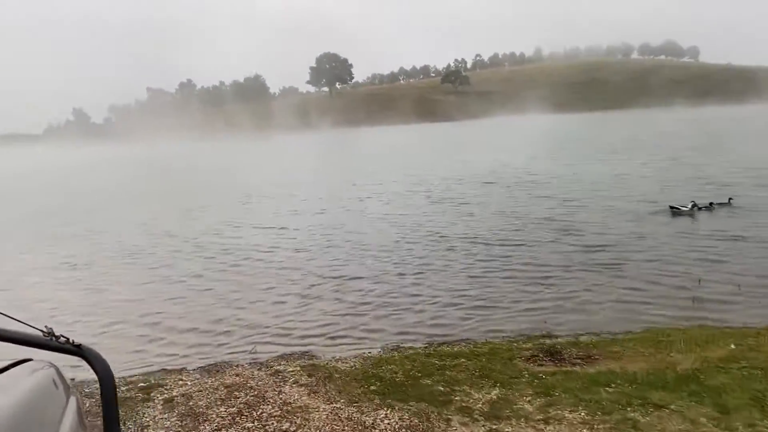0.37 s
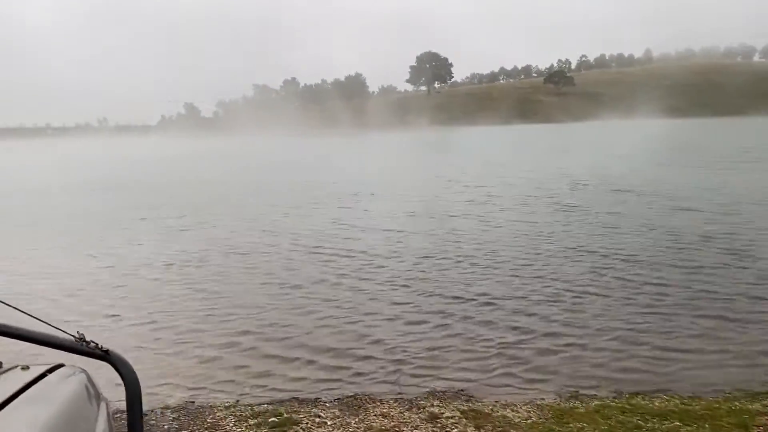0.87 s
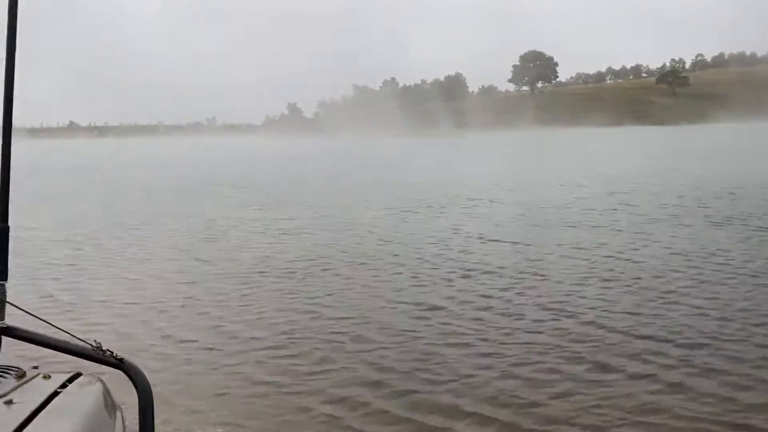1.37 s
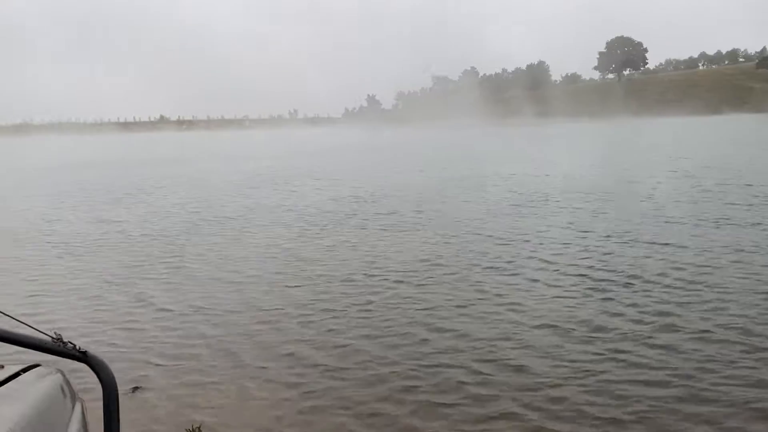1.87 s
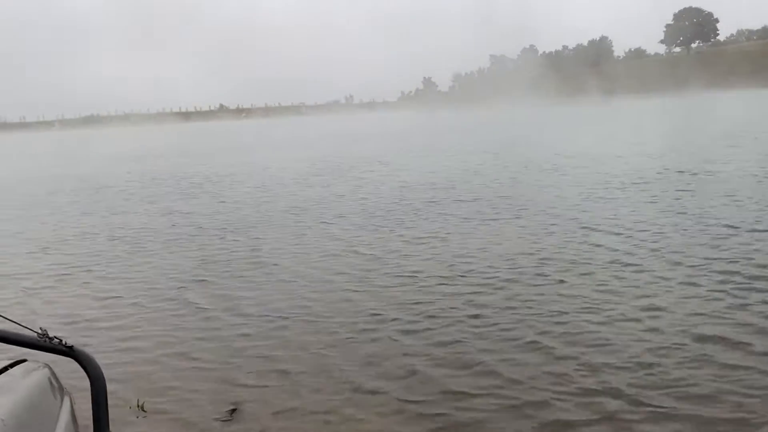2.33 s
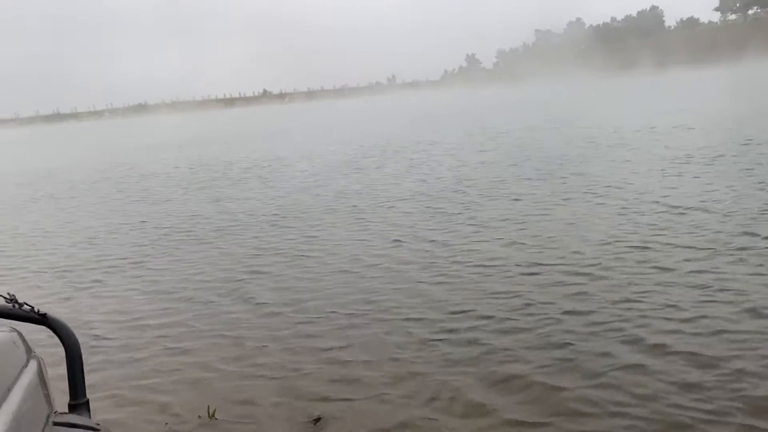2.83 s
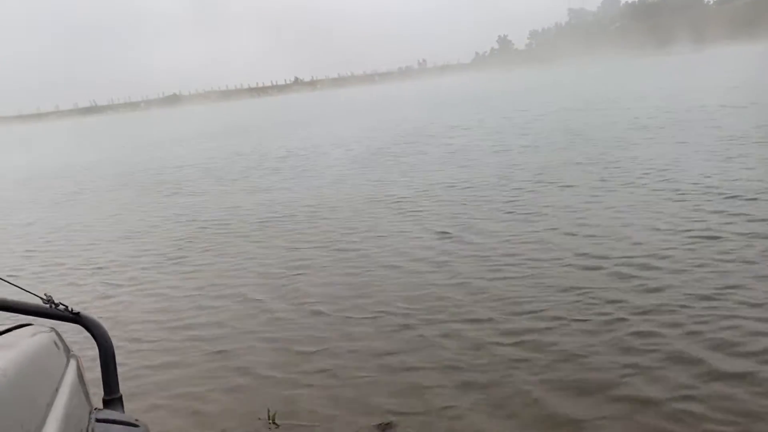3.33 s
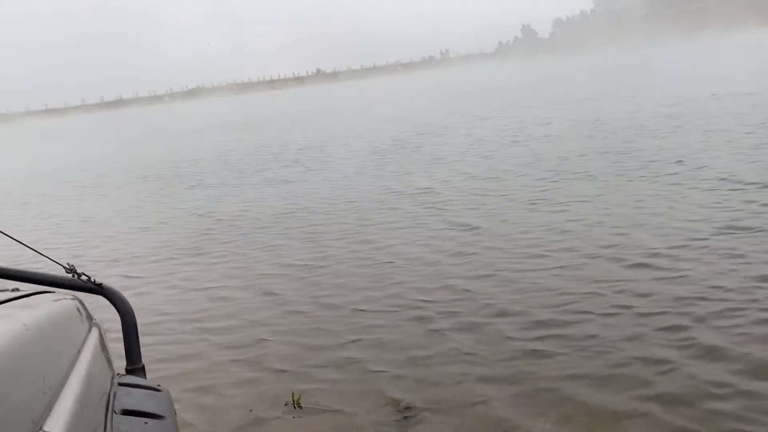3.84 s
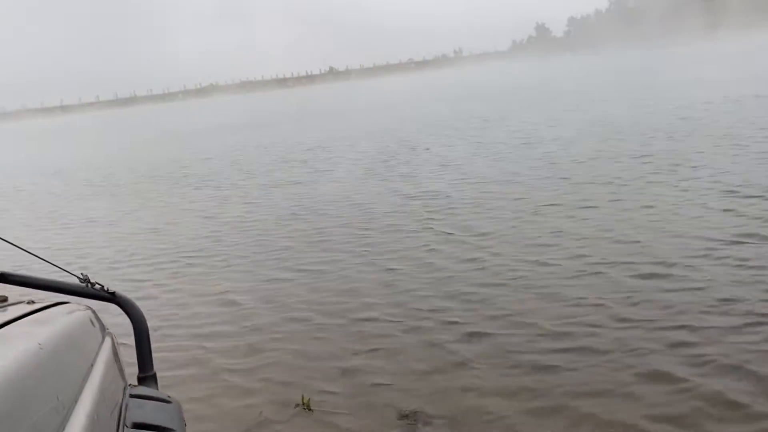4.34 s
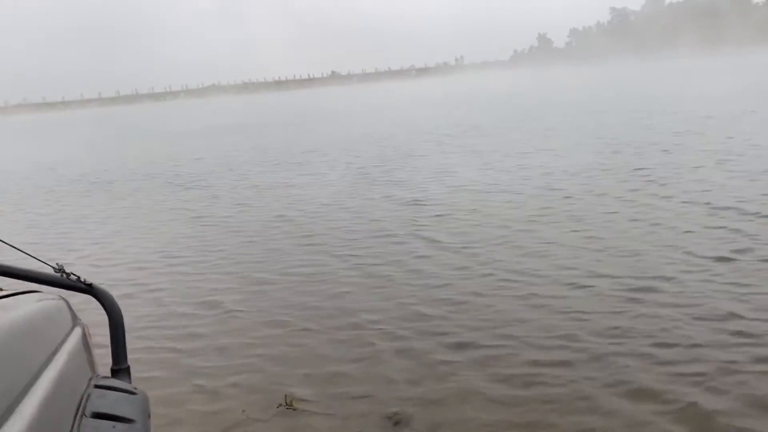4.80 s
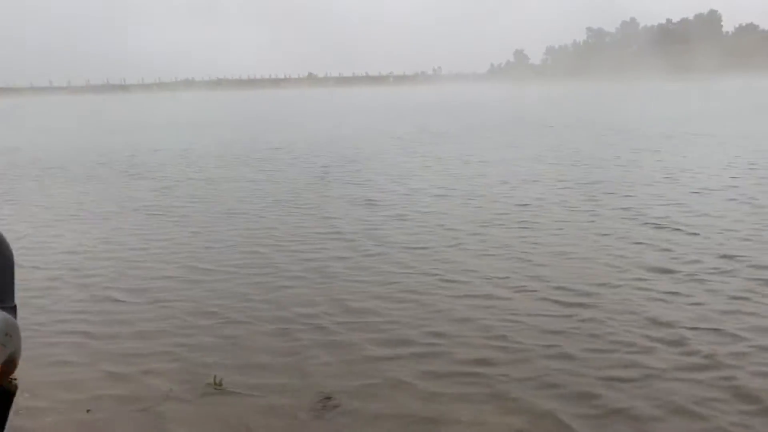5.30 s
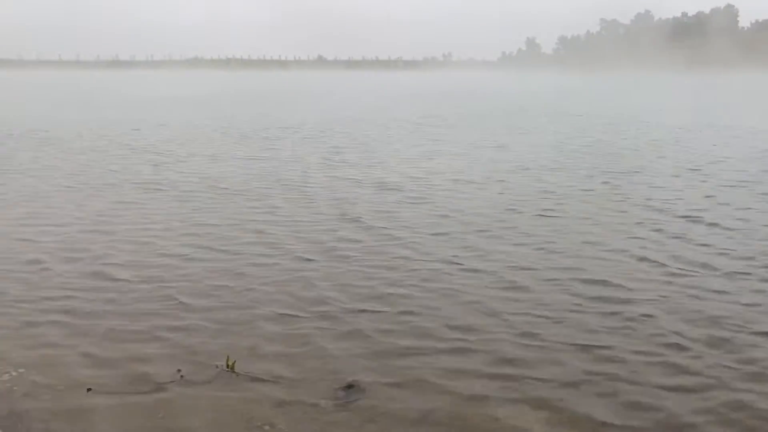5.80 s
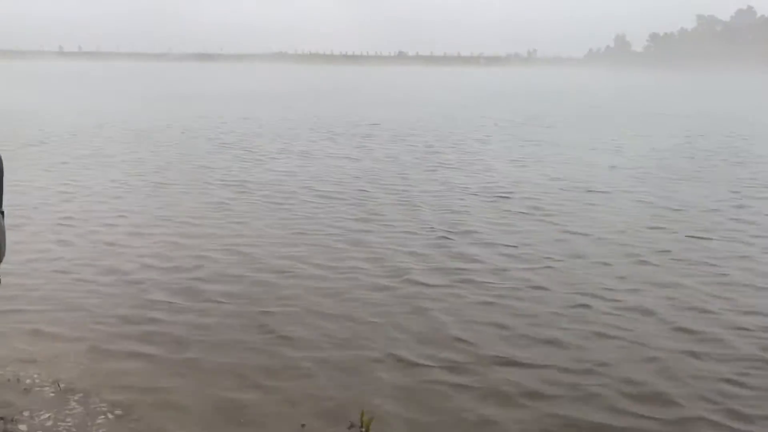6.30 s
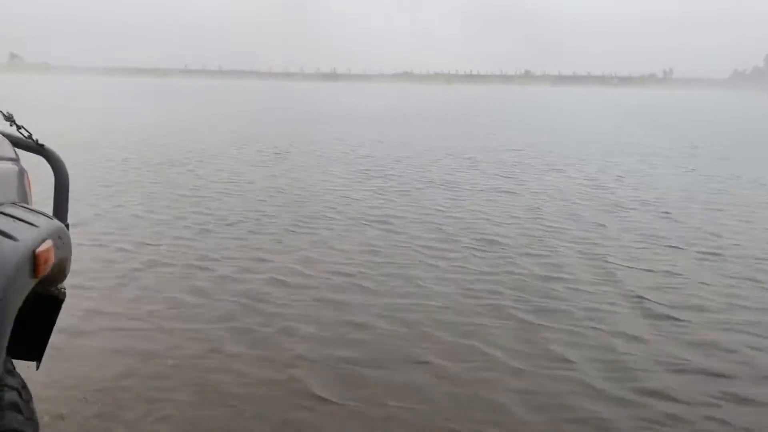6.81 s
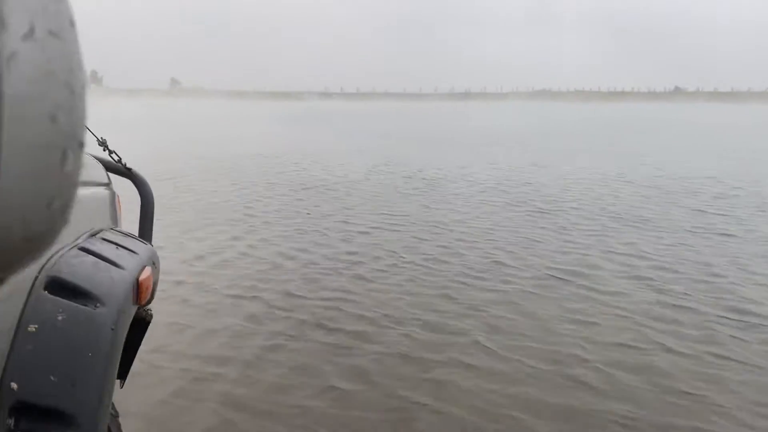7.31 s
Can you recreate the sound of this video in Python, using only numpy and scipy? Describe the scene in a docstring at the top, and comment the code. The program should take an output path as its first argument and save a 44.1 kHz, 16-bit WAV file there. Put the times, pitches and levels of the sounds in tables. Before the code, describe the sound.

An off-road vehicle's engine throbs low as dull bumps give way to gulping, splashing water, then it surges over louder churning.

```python
"""An off-road vehicle with a five-cylinder engine rolls down a shore and wades, heard from a side window.
First come dull bumps, falling thuds with a rattle, over the throb and boom of exhaust tones and a gear whine.
Then gulps ring like closing air pockets, spray bursts and rings a panel, and short tones squeak.
The engine speeds up near 3 s, slows towards 5 s and surges at 6 s, over a rumble of shaped noise.
Churning noise and bubbles run throughout, swelling in surges and growing strongest with the late engine surge."""
import sys
import numpy as np
from scipy import signal
from scipy.fft import rfft, irfft, next_fast_len
from scipy.io import wavfile
from scipy.ndimage import uniform_filter1d

SR = 44100
rng = np.random.default_rng(int(sys.argv[2]) if len(sys.argv) > 2 else 0)


def undo_db(level):
    """Turn decibels back into plain size, where 20 dB means ten times bigger."""
    steps = np.asarray(level, float) / 20
    return 10 ** steps


def output_pcm(signal):
    """Save a mono or channel-first signal as 16-bit PCM at the path in sys.argv[1].

    Samples are clipped to [-1, 1] before scaling.
    """
    pcm = np.clip(np.atleast_2d(signal).T, -1, 1) * 32767
    wavfile.write(sys.argv[1], SR, np.round(pcm).astype(np.int16))


N = 337806
TIME = np.arange(N) / SR  # s
HIT_TIME = np.arange(SR // 4) / SR  # s, time within one short event


def evened(x):
    """Scales to rms 1."""
    return x / np.sqrt(np.mean(x ** 2) + 1e-20)


def read(points, hz, axis=1):
    """Reads one column of a spectrum on a log-frequency axis."""
    columns = np.transpose(points)
    return np.interp(np.log(hz + 1), np.log(columns[0] + 1), columns[axis])


def curve(rows):
    """Joins the (t, value) rows of a table into one value a sample."""
    s, values = np.transpose(rows)
    return np.interp(TIME, s, values)


def wander(top_hz):
    """Slow random drift of rms 1, a sum of twelve slow sines."""
    t = np.arange(0, N + 64, 64) / SR
    slow = sum(np.sin(2 * np.pi * (f * t + rng.random())) for f in np.geomspace(top_hz / 15, top_hz, 12))
    return np.interp(TIME, t, evened(slow))


def band(x, hz, width):
    """A resonance applied twice, scaled to rms 1."""
    b, a = signal.iirpeak(hz, hz / width, SR)
    return evened(signal.lfilter(b, a, signal.lfilter(b, a, x)))


def panned(x, pan_db):
    """Places one sound between left and right by level."""
    return np.array([x * undo_db(pan_db / 2), x * undo_db(-pan_db / 2)])


def add(mix, s, sound):
    """Mixes a sound in at a time."""
    part = mix[:, round(s * SR):][:, :sound.shape[1]]
    part += sound[:, :part.shape[1]]


def fade(t60, rise):
    """Envelope of a short event: a quick rise (s), then a fall of 60 dB in t60 (s), 0.01 s or more."""
    return undo_db(-60 * HIT_TIME / np.maximum(t60, 0.01)) * (1 - np.exp(-HIT_TIME / rise))


def cut(x, s):
    """Takes the stretch of a stereo noise that starts at a time."""
    return np.roll(x, -round(s * SR), 1)[:, :len(HIT_TIME)]


# Stereo width of the noises: (f/Hz, side level over mid/dB, share of side in step with mid [0-1, signed],
# share a quarter cycle ahead [0-1, signed])
STEREO_WIDTH = [(40, 5.5, .1, -1), (200, -7.5, .01, -0.16), (400, -7, 0.13, 1), (1000, -6, 0.024, 0.99),
                (2000, 2.5, 0.046, 0.1), (3400, -3, -0.27, -.3), (5000, -1, -0.62, -.1),
                (6500, -5.5, -.2, .2), (8000, 7, 0.41, .6), (15000, 6.5, .1, .1)]


def noise(spectrum, size, patchy_db, flicker_db):
    """Stereo noise of one colour, with drifting patches and a flicker shared by all bins; mid has rms 1."""
    hop, hz = size // 4, np.fft.rfftfreq(size, 1 / SR)
    z = rng.standard_normal((N // hop + 5, len(hz), 5)).T
    patches = uniform_filter1d(z[4], size=len(hz) // 40 + 1, axis=0)
    patches = evened(uniform_filter1d(patches, size=12, axis=1))
    flicker = evened(uniform_filter1d(rng.standard_normal(z.shape[2]), size=5))
    field = undo_db(read(spectrum, hz)[:, None] + patchy_db * patches + flicker_db * flicker)
    mid, free = (z[:2] + 1j * z[2:4]) * field
    link = (read(STEREO_WIDTH, hz, axis=2) + 1j * read(STEREO_WIDTH, hz, axis=3))[:, None]
    unlinked = np.sqrt(np.clip(1 - abs(link) ** 2, 0, 1))
    side = undo_db(read(STEREO_WIDTH, hz))[:, None] * (link * mid + unlinked * free)
    mid, side = signal.istft(np.array([mid, side]), nperseg=size, noverlap=size - hop)[1][:, :N]
    return np.array([mid + side, mid - side]) / np.std(mid)


def steady(x):
    """Evens out the level over a third of a second."""
    return x / np.sqrt(uniform_filter1d(x ** 2, size=SR // 3) + 1e-9)


# Exhaust level, before its waver: (t/s, level/dB)
EXHAUST_LEVEL = [(0, -22), (0.38, -24), (0.47, -17.5), (1.05, -16), (1.66, -14), (1.73, -23.5), (1.9, -18),
                 (2.9, -17), (3.7, -19), (5.01, -20.5), (5.76, -9.5), (6.76, -12), (7.66, -12)]
# Engine speed: (t/s, f/Hz of the engine cycle)
ENGINE_SPEED = [(0, 8.46), (0.65, 8.35), (1.1, 8.62), (1.3, 8.34), (1.6, 8.3), (1.9, 8.42), (2.38, 8.38),
                (2.7, 9.54), (2.98, 10.27), (3.55, 9.6), (4.4, 9.63), (4.95, 8.22), (5.42, 8.44),
                (6.0, 13.27), (6.09, 13.52), (6.8, 10.86), (7.0, 11.22), (7.22, 11.08), (7.5, 12.22),
                (7.66, 12.58)]
# Five firings a cycle through pipes of uneven length: (multiple of the engine cycle, level/dB)
FIRING_ORDERS = [(5, 1), (6, -6), (7, 2.5), (8, -7.5), (9, 0), (10, -5), (11, -4), (12, 1), (13, -3),
                 (14, 0.5), (15, 5.5), (16, -7), (17, -4.5), (18, -8), (19, 0.5), (20, 2), (21, 1),
                 (22, -5), (23, -3.5), (24, -4.5), (25, 0), (28, -11), (29, -4.5)]
# Colour of the exhaust pipe: (f/Hz, level/dB)
PIPE_COLOUR = [(30, -53.5), (45, -9), (60, -0.5), (85, -5), (105, -3), (125, -21.5), (160, -27),
               (230, -32.5), (275, -21), (320, -50), (450, -20)]
# Silencer boom over the exhaust level; it also swells when a strong multiple meets the silencer: (t/s, level/dB)
BOOM_LEVEL = [(0, -10), (2.4, -7.5), (2.9, -5.5), (4.4, -5), (5.5, -10.5), (6.1, -7), (6.9, -11.5),
              (7.66, -4.5)]
# Gear whine, clearest near idle, before its waver: (t/s, level/dB)
WHINE_LEVEL = [(0, -49), (.4, -36), (1.5, -34.5), (1.75, -42), (2.35, -35), (2.7, -50), (3.2, -42.5),
               (4.5, -51.5), (5.0, -40), (5.4, -42), (5.7, -51), (7.66, -79.5)]
BOOM_HZ, BOOM_WIDTH_HZ = 190.66, 28.3
WHINE_RATIO = 46.4  # whine cycles per engine cycle


def engine():
    """Multiples of the engine cycle pass the pipe and the silencer boom; uneven burning makes each waver."""
    rate, level_db = curve(ENGINE_SPEED), curve(EXHAUST_LEVEL)
    cycles, pipe, boom = np.cumsum(rate) / SR, np.zeros(N), np.zeros(N)
    for k, db in FIRING_ORDERS:
        burn_db = db + 1.9 * wander(top_hz=7)
        phase = 2 * np.pi * (k * cycles + rng.random()) + 0.25 * wander(top_hz=7)
        tone = undo_db(burn_db) * np.cos(phase)
        pipe += undo_db(read(PIPE_COLOUR, k * rate)) * tone
        boom += np.exp(-(2 * (k * rate - BOOM_HZ) / BOOM_WIDTH_HZ) ** 2) * tone
    tones = undo_db(level_db + 1.45 * wander(top_hz=5.4)) * steady(pipe)
    tones += undo_db(level_db + curve(BOOM_LEVEL)) * boom
    whine = np.cos(2 * np.pi * WHINE_RATIO * cycles + 0.4 * wander(top_hz=12))
    tones += undo_db(curve(WHINE_LEVEL) + 2.6 * wander(top_hz=9)) * whine
    # a quarter-cycle copy makes the tones reach the left a little later
    lag = undo_db(-12.5) * signal.hilbert(tones, next_fast_len(N))[:N].imag
    return np.array([tones + lag, tones - lag])


# Colour of the body and tyre rumble: (f/Hz, level/dB per Hz)
RUMBLE_COLOUR = [(15, -43), (25, -3), (46, -9), (70, 0), (97, -16), (141, -3.5), (189, 2), (213, -6),
                 (243, -4.5), (430, -9.5), (600, -48), (780, -78), (1320, -120)]


def rumble():
    """Body and tyres rumble as low noise that follows the exhaust level, 17 dB under it."""
    return undo_db(curve(EXHAUST_LEVEL) - 17) * noise(RUMBLE_COLOUR, size=2048, patchy_db=1.5, flicker_db=-1.8)


# Pockets of air closing in the water: (t/s, level/dB, f/Hz at the start,
# cycles until 60 dB is lost [taken as 2-40], slap over the gulp level/dB)
AIR_POCKETS = [(0.341, -23, 1430, 5, -6), (0.694, -19.5, 477, 10.5, -19), (0.748, -46, 2350, 18, -20),
               (0.759, -20, 855, 7, -22), (0.783, -12, 820, 10, -29), (0.828, -25, 800, 16, -19),
               (0.862, -21.5, 597, 9, -25), (0.934, -21, 960, 8, -23), (0.974, -19, 1210, 10, -20),
               (1.275, -19, 670, 6, -18), (1.338, -18, 736, 4, -13), (1.369, -24, 900, 5, -30),
               (1.382, -18, 810, 18, -29), (1.389, -15.5, 870, 6, -27), (1.394, -19, 1070, 8, -28),
               (1.413, -25, 945, 5, -15), (1.44, -27, 1040, 14, -5), (1.5, -20.5, 700, 11, -25),
               (1.513, -22, 740, 17, -24), (1.897, -24.5, 610, 3, -20), (1.933, -25, 1000, 4, -7),
               (1.991, -26, 950, 22, -23), (2.013, -29, 945, 12, -28), (2.11, -26, 940, 7, -18),
               (2.197, -30, 1120, 5, -9), (3.089, -16, 830, 3.2, -32), (3.577, -30, 1210, 16, -11),
               (3.642, -26, 870, 18, -24), (3.647, -24.5, 1260, 27, -26), (3.657, -32, 1450, 20, -25),
               (4.734, -29.5, 1050, 12, -13), (4.831, -36, 1930, 22, -23), (5.77, -16, 935, 9, -28),
               (5.806, -12.5, 860, 5, -34), (6.476, -22, 1280, 11, -10.5), (7.151, -20.5, 1000, 13, -14),
               (7.219, -22.5, 994, 24.5, -10.5), (7.225, -19.5, 2310, 22, -18),
               (7.431, -15, 1217, 30, -23.5), (7.453, -18, 1290, 19, -18), (7.478, -18.5, 1090, 12, -25),
               (7.505, -23, 1000, 14, -28), (7.56, -24, 1160, 10, -21), (7.595, -21, 1470, 10, -20)]


def gulps():
    """Each closing air pocket rings with a rising pitch, with a puff of noise round it and a brighter slap."""
    out, white = np.zeros((2, N)), rng.standard_normal((2, N))
    for s, db, hz, turns, slap_db in AIR_POCKETS:
        t60 = np.clip(turns, 2, 40) / hz
        pan_db = np.interp(s, *np.transpose(CHURN_PAN))
        puff_noise, slap_noise = cut(white, s)
        ring = undo_db(4) * np.sin(2 * np.pi * hz * (HIT_TIME + 3.0 * HIT_TIME ** 2)) * fade(t60, 0.0004)
        puff = undo_db(-11) * band(puff_noise, hz, 0.7 * hz) * fade(0.055, 0.0008)
        slap = undo_db(slap_db) * band(slap_noise, 2300, 1000) * fade(0.018, 0.0008)
        add(out, s, panned(undo_db(db) * (ring + puff + slap), pan_db))
    return out


# Spray hitting the body: (t/s, level/dB before a common 10 dB cut, t60/s, panel ring over that level/dB)
SPRAY_HITS = [(0.639, -31, 0.032, -7), (0.7288, -21.5, 0.04, -25), (0.746, -21, 0.026, -27),
              (1.333, -26.5, 0.042, -15), (1.505, -32.5, 0.079, -12), (2.1045, -24, 0.093, -5),
              (2.196, -24.5, 0.062, 4.5), (3.6414, -32, 0.068, 6), (4.288, -39, 0.07, 4),
              (4.388, -34.5, 0.085, -11), (4.678, -36.5, 0.022, -15), (4.7273, -24.5, 0.06, -4.5),
              (4.783, -33, 0.033, -12), (5.187, -32, .055, -17), (5.507, -33.5, 0.076, -13),
              (5.925, -27, .09, -10), (6.131, -34, 0.04, 10), (7.168, -25, 0.061, -12),
              (7.286, -32, 0.035, 10)]
# Panel resonances that the spray rings: (f/Hz, level/dB, t60/s that sets the bandwidth)
PANEL_MODES = [(2900, -2, 0.08), (3150, -1, 0.06), (3540, -9, 0.05), (3950, 0, 0.08), (4200, -4, 0.06),
               (4800, -7, 0.08), (6340, -6, 0.044)]


def spray():
    """Spray is a burst of fizz with a sharp front; its hit rings the panel as narrow bands of noise."""
    out, white = np.zeros((2, N)), rng.standard_normal((2, N))
    hiss = noise(FIZZ_COLOUR, size=256, patchy_db=2.2, flicker_db=1.2)
    for s, db, t60, ring_db in SPRAY_HITS:
        ring = np.zeros(len(HIT_TIME))
        for hz, mode_db, decay in PANEL_MODES:
            spot_db = 2.2 * rng.standard_normal()  # each hit finds another spot
            ring += undo_db(mode_db + spot_db) * band(cut(white, s)[1], hz, 24 / decay)
        burst = cut(hiss, s) * (fade(t60, 0.0024) + fade(0.01, 0.00055))
        ring = panned(undo_db(ring_db) * ring * fade(t60, 0.0058), -6.0)
        add(out, s, undo_db(db - 10) * (burst + ring))
    return out


# Dull bumps through the chassis: (t/s, level/dB, f/Hz to which the falling pitch is scaled)
CHASSIS_BUMPS = [(0.069, -22, 265), (0.079, -17, 232), (0.098, -19.5, 276), (0.107, -23, 252),
                 (0.139, -16, 270), (0.176, -22, 224), (1.665, -20, 230), (1.678, -10.5, 282),
                 (1.7, -16, 209), (1.746, -18.5, 324), (1.999, -17, 240), (3.651, -17.5, 300),
                 (3.669, -14, 281)]


def bumps():
    """A thud swells for a few ms while its pitch falls from 2.39 to 0.49 times the listed f, with a rattle."""
    out, white = np.zeros((2, N)), rng.standard_normal((2, N))
    rise_s, drop = 0.003, 1.9  # drop is in multiples of f
    u = HIT_TIME / rise_s
    for s, db, hz in CHASSIS_BUMPS:
        turns = hz * (0.49 * HIT_TIME + drop * rise_s * (1 - np.exp(-u)))
        thud = np.sin(2 * np.pi * turns) * u * np.exp(1 - u)
        rattle = undo_db(-19.5) * band(cut(white, s)[0], 1.17 * hz, 2.7 * hz) * fade(0.058, 0.0018)
        add(out, s, panned(undo_db(db) * (thud + rattle), 0))
    return out


# Short squeaks: (t/s, length/s, f/Hz at the start, level/dB)
SQUEAK_EVENTS = [(0.782, 0.01, 2600, -35), (1.068, 0.01, 2630, -35), (1.196, 0.03, 2600, -39),
                 (3.484, 0.02, 2050, -38), (3.485, 0.027, 2450, -45), (3.5, 0.042, 2050, -38)]


def squeaks():
    """A squeak is a slightly sagging tone with its octave and a narrow band of noise."""
    out, white = np.zeros((2, N)), rng.standard_normal((2, N))
    for s, length, hz, db in SQUEAK_EVENTS:
        u = HIT_TIME[HIT_TIME < length]
        phase = 2 * np.pi * hz * (u - 0.4 * u ** 2)
        grit = 0.4 * band(cut(white, s)[1], hz, 0.12 * hz)[:len(u)]
        squeak = np.sin(phase) + grit + undo_db(-15) * np.sin(2 * phase)
        add(out, s, panned(undo_db(db) * squeak * np.hanning(len(u)), -3.3))
    return out


def bubbles(per_s, low_hz, high_hz, turns, spread_db):
    """Many small bubbles of rising pitch, a few of them loud; each of 16 pitches has its own place."""
    out = np.zeros((2, N))
    for hz in np.geomspace(low_hz, high_hz, 16):
        u = np.arange(0, 3 * turns, hz / SR) / turns
        grain = np.sin(2 * np.pi * turns * (u + 0.064 * u ** 2)) * u ** 0.051 * np.exp(-2.2 * u)
        born = rng.random(N) < per_s / 16 / SR
        size = undo_db(spread_db * np.minimum(rng.exponential(1, N), 5)) * born
        out += panned(signal.oaconvolve(size, grain)[:N], 4.5 * rng.standard_normal())
    return evened(out)


# Churning level, before the surges: (t/s, level/dB)
CHURN_LEVEL = [(0, -38), (1.58, -38), (2.22, -41), (3.07, -40), (3.8, -42.5), (5.12, -43), (5.44, -38),
               (5.97, -31), (7.06, -33), (7.66, -32.5)]
# The churning, and the gulps with it, move as the microphone turns: (t/s, left over right level/dB)
CHURN_PAN = [(0, -3), (3.6, -4.5), (5.0, -2.5), (5.8, 4), (7.66, 0)]
# Surges of the churning: (middle t/s, length/s, level/dB before each layer scales it)
SURGES = [(0.878, 0.29, 2.5), (1.426, 0.33, 1.5), (1.97, 0.15, 2.5), (3.676, 0.091, 3.5), (4.76, 0.13, 2.5),
          (5.801, 0.076, 2), (7.254, 0.19, 2.5), (7.568, 0.47, 3.5)]
# Colour of the churning: (f/Hz, level/dB per Hz)
CHURN_COLOUR = [(250, -5.5), (400, 4.5), (600, -2), (1200, -3.5), (1600, -10), (2200, -27), (3000, -22.5),
                (5000, -72)]
# Colour of the fizz, also used by the spray: (f/Hz, level/dB per Hz)
FIZZ_COLOUR = [(1500, 0.5), (2300, 3), (3100, -2), (3900, 5.5), (4800, 0), (7000, -1.5), (9000, -15),
               (12000, -5.5), (14000, -14.5), (16000, -37)]


def water():
    """Churning and fizz round the wheels are noise that carries bubbles, stronger in a surge."""
    surge_db = sum(db * np.exp(-abs(2 * (TIME - s) / length) ** 3) for s, length, db in SURGES)
    level_db = curve(CHURN_LEVEL) + 0.67 * surge_db
    churn = noise(CHURN_COLOUR, size=512, patchy_db=2.0, flicker_db=1.0)
    large = bubbles(per_s=700, low_hz=560, high_hz=2500, turns=4.5, spread_db=3.8)
    churn += undo_db(2.4 * surge_db - 9) * large
    rustle = rng.standard_normal(N) + 0.54 * rng.standard_normal((2, N))  # partly shared by both sides
    churn += undo_db(2.4 * surge_db - 18.5) * band(rustle, hz=1880, width=1500)  # a surge rustles brighter
    fizz = noise(FIZZ_COLOUR, size=256, patchy_db=1.83, flicker_db=1.0)
    small = bubbles(per_s=500, low_hz=2800, high_hz=13500, turns=7.6, spread_db=4.3)
    fizz += undo_db(2.1 * surge_db - 13) * small
    fizz_db = -13 + 0.85 * surge_db  # over the churning
    return undo_db(level_db) * (panned(1, curve(CHURN_PAN)) * churn + undo_db(fizz_db) * fizz)


def scene():
    """Engine, splashes, knocks and water together."""
    return engine() + rumble() + gulps() + spray() + bumps() + squeaks() + water()


def roll_off(x):
    """The treble ends steeply here."""
    return signal.sosfilt(signal.butter(12, 14340, fs=SR, output="sos"), x)


def record(dry):
    """Rounds off loud peaks; empties one treble band in the sum of the channels, another in the difference."""
    dry = 1.18 * np.tanh(dry / 1.454)
    size = next_fast_len(N)
    hz = np.fft.rfftfreq(size, 1 / SR)

    def without(x, low, high):
        """Empties a band, with slopes 400 Hz wide outside it."""
        gain = 1 - np.clip(np.minimum(hz - low, high - hz) / 400 + 1, 0, 1)
        return irfft(rfft(x, size) * gain, size)[:N]

    mid = without(dry[0] + dry[1], 8500, 9720) / 2
    side = without(dry[0] - dry[1], 10860, 13400) / 2
    return roll_off(np.array([mid + side, mid - side]))


dry = scene()
out = record(dry)
output_pcm(out)
```